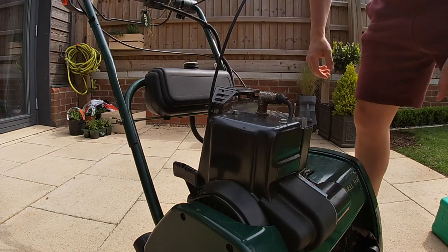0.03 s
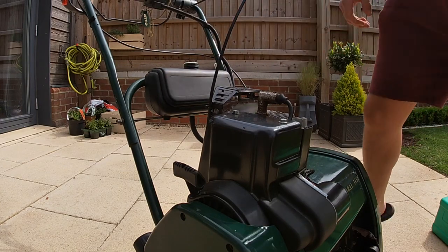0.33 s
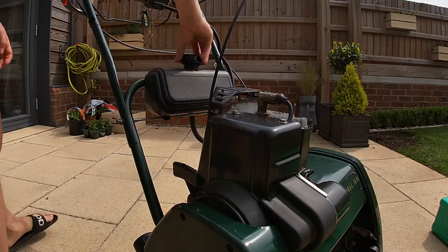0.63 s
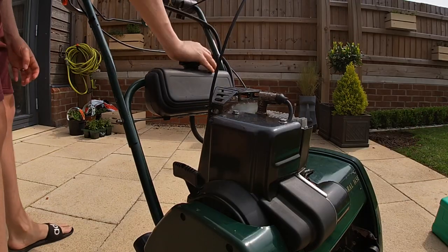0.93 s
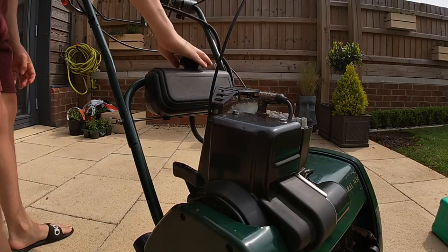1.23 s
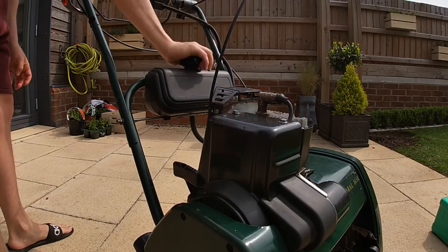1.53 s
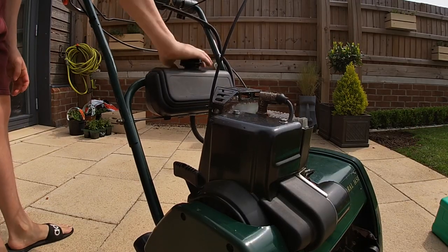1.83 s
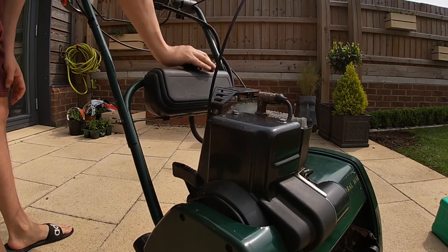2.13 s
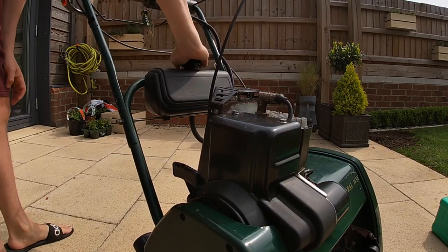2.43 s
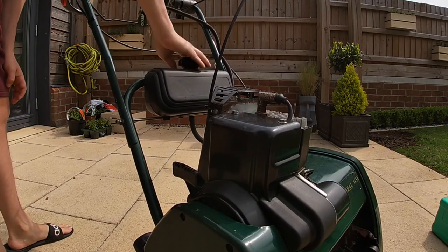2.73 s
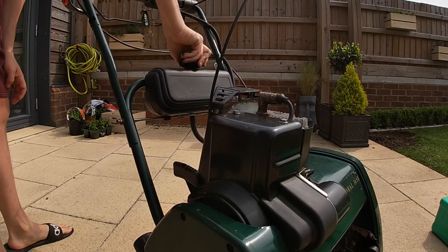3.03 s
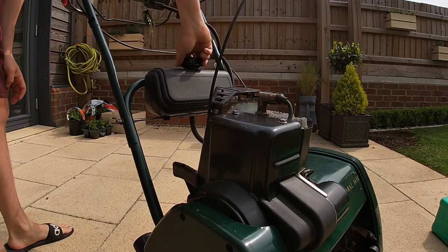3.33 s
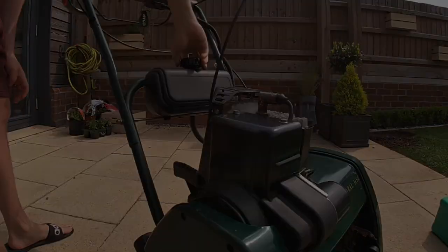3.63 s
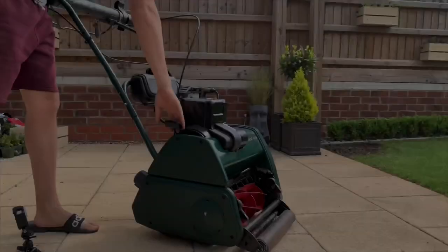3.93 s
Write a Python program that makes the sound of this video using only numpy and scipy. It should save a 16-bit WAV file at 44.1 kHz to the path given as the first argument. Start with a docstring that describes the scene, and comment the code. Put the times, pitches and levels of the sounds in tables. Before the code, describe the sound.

A mower's plastic fuel cap is handled and twisted in a quiet garden. Soft hollow knocks and a thud fill the first 0.6 seconds. The cap rubs around 1.1 seconds while a small bird chirps faintly, then clicks on the tank from 1.7 to 2.8. A loud, crackling air rush overloads the microphone from about 2.9 to 3.3. A faint click, rub and chirp follow, fading by 3.8.

```python
"""A hand twists the plastic fuel cap of a stopped lawn mower on a fenced patio.
Over garden air and a far drone, soft rubs and hollow knocks come first, then a palm thuds on the tank.
A small bird starts calling; the cap rubs on its thread, then clicks and rings the tank's modes.
Near the end a rush of air buffets the microphone, crackles and overloads it.
A last click, rub and chirp follow, and the sound fades out."""
import sys
import numpy as np
from scipy import signal
from scipy.fft import rfft, irfft
from scipy.io import wavfile
from scipy.ndimage import uniform_filter1d

SR = 44100
rng = np.random.default_rng(int(sys.argv[2]) if len(sys.argv) > 2 else 0)


def persist_wave(psi):
    """Save psi, clipped to +-1, as 16-bit WAV."""
    counts = np.round(np.clip(psi, -1, 1) * 32767).astype(np.int16)
    wavfile.write(sys.argv[1], SR, np.atleast_2d(counts).T)


N = 176400
T = np.arange(N) / SR
FREQ_HZ = np.arange(N // 2 + 1) * SR / N

# garden air, far drone: (time [s], level [dB])
AIR_LEVEL = [(0, -55.5), (.6, -49), (.9, -52), (1.55, -54.5), (1.9, -53), (2.3, -47.5), (2.55, -51.5),
             (3.7, -51.5)]
DRONE_LEVEL = [(.55, -51), (.7, -45), (1.15, -40), (1.5, -51.5), (1.72, -37.5), (1.85, -48), (2.4, -55)]
# air spectrum: (frequency [Hz], level [dB])
AIR_SPECTRUM = [(25, 3), (130, 0.5), (250, -6), (450, -16.5), (900, -16.5), (2000, -26), (4000, -32),
                (7000, -34), (10000, -42.5), (15000, -65)]
# hand and thread rubs: (centre [s], half length [s], level [dB])
RUBS = [(0.008, 0.036, -49.5), (0.04, 0.0039, -46.5), (0.147, 0.074, -54), (0.305, 0.023, -50.5),
        (.78, .1, -62), (1.103, 0.1, -43.5), (1.462, 0.17, -61), (2.111, 0.056, -58), (2.536, 0.031, -60),
        (3.412, 0.044, -57.5), (3.627, 0.011, -59)]
# rub spectrum: (frequency [Hz], level [dB])
RUB_SPECTRUM = [(400, -36), (620, -34), (800, -12.5), (1640, -1.5), (5600, -2.5), (7030, -9),
                (15000, -38.5)]
# tone points of a blow: (frequency [Hz])
TONE_HZ = [500, 950, 2000, 5000]
# hollow knocks, cap clicks: (time [s], level at each of TONE_HZ [dB])
KNOCKS = [(.083, -36, -19.5, -32.5, -42), (.150, -53, -53, -34.5, -44.5), (.167, -39.5, -37, -28.5, -42.5),
          (.228, -43, -30, -35.5, -46), (.2605, -36, -36, -40, -47.5), (.3285, -32.5, -33.5, -35.5, -49),
          (.356, -37, -45, -59, -60), (.3885, -42, -43.5, -55, -53), (.469, -48, -55, -35.5, -56.5),
          (.533, -46, -56, -46, -60.5), (.591, -50, -44.5, -57, -72), (.836, -68, -55, -58, -76)]
CLICKS = [(1.683, -40.5, -53, -57.5, -61), (1.7595, -31, -44, -42, -53.5), (1.980, -41.5, -48, -61, -76),
          (2.085, -50, -41, -62, -79), (2.1555, -38, -45, -49, -57), (2.2937, -24, -36, -30.5, -42),
          (2.629, -44, -42, -48, -61), (2.7635, -28, -40, -35.5, -45), (3.531, -41.5, -47, -60.5, -64)]
# their modes: (frequency [Hz], gain [dB], t60 [s], swell [s])
KNOCK_MODES = [(547, -1, 0.1, 0.0037), (672, -5, 0.044, .001), (906, -1, 0.066, 0.00085),
               (1553, -21, 0.071, 0.00044), (1872, -5.5, 0.071, 0.00034), (3720, 5, 0.011, 0.00041),
               (5185, 11, 0.018, 0.00047), (6750, 4, 0.016, 0.00034)]
TANK_MODES = [(160.6, 0, .28, 0.043), (339, 1, .12, .02), (428, 4, .11, .022), (518.6, -1, .12, 0.016),
              (847, -9, .16, 0.0037), (985, -10, .17, 0.0026), (1746, 17.5, 0.012, 0.00058),
              (1930, 2, .14, 0.0027), (2526, 0.5, 0.02, .0004), (3575, -14, .12, .0005),
              (4690, -6.5, 0.084, .0005)]
# their clatter spectra: (frequency [Hz], level [dB])
KNOCK_CLATTER = [(150, -33), (500, 12.5), (900, -1), (1700, 0.5), (2800, -3.5), (3500, 0.5), (4200, -4.5),
                 (5200, 3.5), (7500, -17), (10000, -12.5), (15000, -91)]
TANK_CLATTER = [(120, -18), (400, 8), (1000, 4.5), (1300, 0), (1850, 8.5), (3000, -14.5), (4400, -2.5),
                (7000, -11.5), (15000, -48)]
# tank modes under the palm: (frequency [Hz], gain [dB])
THUD_MODES = [(205, 3), (320, -8), (447, 1.5), (576, -4), (807, -8), (1000, -9), (1200, -11.5)]
# dull frame bumps: (time [s], level [dB], top frequency [Hz])
BUMPS = [(0.426, -36.5, 1250), (1.876, -33, 80.4), (1.895, -38.5, 207), (1.975, -36.5, 156),
         (2.09, -36.5, 104), (3.622, -44, 460)]
# bird chirps: (time [s], level [dB], start pitch [Hz], end pitch [Hz])
CHIRPS = [(.602, -57, 3650, 2690), (0.87, -55, 4000, 3080), (.932, -44, 4270, 3050),
          (.997, -43.5, 4250, 3050), (1.271, -52, 4250, 2940), (1.340, -53, 4220, 2910),
          (1.412, -54, 4170, 2880), (1.49, -53.5, 4200, 3020), (1.565, -53.5, 4250, 2900),
          (3.703, -52, 4550, 5750)]
# layers of the rush: (time [s], level [dB])
BUFFET_LEVEL = [(2.69, -75), (2.71, -48), (2.76, -30.5), (2.85, -35), (2.90, -22), (2.94, -14.5),
                (2.99, -4), (3.02, -3.5), (3.07, -3.5), (3.11, 2.5), (3.17, -2.5), (3.22, -11), (3.29, -17),
                (3.325, -57), (3.36, -92)]
ROAR_LEVEL = [(2.78, -80), (2.86, -33), (2.91, -25), (2.998, -22.5), (3.007, -11), (3.07, -15), (3.11, -9),
              (3.18, -14), (3.26, -22), (3.303, -34), (3.33, -83)]
HISS_LEVEL = [(2.85, -88), (2.90, -41), (2.997, -43), (3.01, -38), (3.08, -46), (3.097, -18.5),
              (3.155, -18), (3.17, -24.5), (3.26, -32), (3.30, -44), (3.33, -82.5)]
# snaps in the rush: (time [s], level [dB])
CRACKLES = [(2.8985, -31.5), (2.922, -34), (2.938, -32), (2.976, -30.5), (3.007, -31.5), (3.106, -11),
            (3.126, -14), (3.1535, -12)]
# spectra in the rush: (frequency [Hz], level [dB])
RUSTLE_SPECTRUM = [(60, -9), (200, -2), (450, 0.5), (700, -9.5), (1150, -12), (2000, -25), (2900, -30.5),
                   (3500, -26.5), (3900, -45.5), (15000, -53.5)]
BUFFET_SPECTRUM = [(20, -6), (40, 0), (65, -8.5), (110, -2), (160, -8.5), (220, -16), (400, -33),
                   (900, -56), (15000, -110)]
ROAR_SPECTRUM = [(60, -7), (200, -4.5), (350, 1.5), (600, -5), (1000, -10.5), (1800, -23.5), (3000, -33.5),
                 (5000, -43.5), (15000, -57)]
HISS_SPECTRUM = [(400, -33), (1200, 10.5), (2200, 7.5), (3500, 0), (5500, -3), (8000, -9), (11000, -17),
                 (15000, -26.5)]
CRACKLE_SPECTRUM = [(2000, 2.5), (7000, -2), (15000, -18)]
# microphone port peaks: (frequency [Hz], gain [dB])
PORT_RESONANCES = [(238, 5.5), (597, 9), (670, 5), (938, 6), (1245, 6.5)]
# left-right likeness at the ports: (frequency [Hz], correlation [0..1])
PORT_CORRELATION = [(40, 0.89), (120, 0.88), (400, .35), (1200, .12)]


def from_db(db):
    return 10 ** (np.asarray(db) / 20)


def unit_rms(x):
    return x / np.sqrt(np.mean(x ** 2) + 1e-20)


def level(rows):
    """Gain over time from (time [s], level [dB]) points."""
    return from_db(np.interp(T, *np.transpose(rows)))


def at_hz(points, hz):
    """Table lookup on a log-frequency axis."""
    points_hz, values = np.transpose(points)
    return np.interp(np.log(hz + 1e-3), np.log(points_hz), values)


def drift(rate_hz):
    """Low-passed random wander, rms 1."""
    return unit_rms(irfft(rfft(rng.standard_normal(N)) / (1 + (FREQ_HZ / rate_hz) ** 2), N))


def noise(spectrum, size=N):
    """Shaped noise, rms 1."""
    hz = np.arange(size // 2 + 1) * SR / size
    gain = from_db(at_hz(spectrum, hz)) * np.minimum(hz / spectrum[0][0], 1) ** 2
    return unit_rms(irfft(gain * rfft(rng.standard_normal(size)), size))


def evened(x, window_samples):
    """Hold noise power steady over a sliding window."""
    power = np.mean(np.atleast_2d(x) ** 2, axis=0)
    return x / np.sqrt(uniform_filter1d(power, size=window_samples) + 1e-6)


def echo(x, delay_s, gain_db):
    """One reflection."""
    return from_db(gain_db) * np.interp(T - delay_s, T, x, left=0)


def strikes(blows, modes, clatter, crack_db, crack_s, tail_db, tail_s, tail_rise_s, contact_s):
    """Each blow: short crack, clatter tail and ringing modes, all tilted by its tone."""
    size = SR // 2
    t, bins_hz = T[:size], np.arange(size // 2 + 1) * SR / size
    crack = from_db(crack_db) * np.exp(-t / crack_s)
    tail = from_db(tail_db) * np.exp(-t / tail_s) * (1 - np.exp(-t / tail_rise_s))
    out = np.zeros(N + size)
    for time_s, *tone_db in blows:
        tone = list(zip(TONE_HZ, tone_db))
        dense = irfft(rfft(noise(clatter, size)) * from_db(at_hz(tone, bins_hz)), size)
        blow = np.std(dense) * evened(unit_rms(dense), window_samples=260) * (crack + tail)
        for hz, mode_db, t60_s, swell_s in modes:
            envelope = np.exp(-np.log(1000) * t / t60_s) * (1 - np.exp(-t / swell_s))
            detune = 1 + .006 * rng.standard_normal()
            gain = from_db(at_hz(tone, hz) + mode_db + rng.normal(0, 1.2))
            blow += gain * envelope * np.sin(2 * np.pi * (hz * detune * t + rng.random()))
        start = int(time_s * SR)
        out[start:start + size] += blow * (1 - np.exp(-(t / contact_s) ** 2))
    return out[:N]


def garden(drone_hz=70.7, wander_hz=10, waver_db=2.6):
    """Quiet open air and a far, wavering drone."""
    phase = 2 * np.pi * np.cumsum(drone_hz + wander_hz * drift(8.8)) / SR
    air = level(AIR_LEVEL) * noise(AIR_SPECTRUM)
    drone = level(DRONE_LEVEL) * from_db(waver_db * drift(8)) * np.sin(phase)
    return air + drone


def rubs(grain_db=2.0):
    """Skin and plastic slide in smooth, slightly grainy swells."""
    swells = np.zeros(N)
    for centre_s, half_s, db in RUBS:
        offset = (T - centre_s) / half_s
        swells += from_db(db) * np.exp(-.5 * offset ** 2 - .1 * offset ** 4)
    return swells * from_db(grain_db * drift(120)) * noise(RUB_SPECTRUM)


def knocks():
    """Hollow knocks ring briefly and echo off a wall."""
    direct = strikes(KNOCKS, KNOCK_MODES, KNOCK_CLATTER, crack_db=6.5, crack_s=0.0036,
                     tail_db=-3, tail_s=0.02, tail_rise_s=0.0016, contact_s=0.0004)
    return direct + echo(direct, delay_s=0.0132, gain_db=-15.5)


def palm_thud(time_s=.424, gain_db=-34, rise_s=.018, t60_s=0.21):
    """A soft palm sets the hollow tank ringing with a slow onset."""
    age_s = np.maximum(T - time_s, 0)
    rise = 1 - np.exp(-(age_s / rise_s) ** 2)
    decay = np.exp(-np.log(1000) * (age_s - rise_s) / t60_s)
    ring = sum(from_db(db) * np.sin(2 * np.pi * (hz * age_s + rng.random())) for hz, db in THUD_MODES)
    return from_db(gain_db) * rise * decay * ring


def frame_bumps(rise_s=0.025, low_hz=27.7):
    """Soft pushes on the frame swell and die without a click."""
    out = np.zeros(N)
    for time_s, db, top_hz in BUMPS:
        age = np.maximum(T - time_s, 0) / rise_s
        swell = (age * np.exp(1 - age)) ** 2
        spectrum = [(low_hz, 0), (top_hz / 2, 0), (top_hz, -5), (top_hz * 3, -24), (SR / 2, -95)]
        out += from_db(db) * swell * evened(noise(spectrum), window_samples=1300)
    return out


def bird(chirp_s=.032, hold_share=.4, waver_db=2.5, scatter_s=.02, scatter_db=-5):
    """Thin whistles hold, then glide steeply; the fence echoes them, the garden blurs them."""
    calls = np.zeros(N)
    for time_s, db, start_hz, end_hz in CHIRPS:
        progress = np.clip((T - time_s) / chirp_s, 0, 1)
        glide = np.maximum((progress - hold_share) / (1 - hold_share), 0) ** 1.2
        phase = 2 * np.pi * np.cumsum(start_hz + (end_hz - start_hz) * glide) / SR
        calls += from_db(db) * np.sqrt(2 * progress * (1 - progress)) * np.sin(phase)
    calls *= from_db(waver_db * drift(90))
    t = T[:SR // 8]
    scatter = rng.standard_normal(len(t)) * np.exp(-t / scatter_s)
    blur = signal.fftconvolve(calls, scatter / np.linalg.norm(scatter))[:N]
    return calls + echo(calls, delay_s=.013, gain_db=-9) + from_db(scatter_db) * blur


def cap_clicks():
    """The cap strikes the tank and rings its modes."""
    return strikes(CLICKS, TANK_MODES, TANK_CLATTER, crack_db=3, crack_s=0.0044,
                   tail_db=-1, tail_s=.02, tail_rise_s=0.0062, contact_s=0.00054)


def port_noise(spectrum):
    """Turbulence at two microphone ports: shared in the bass, separate higher up."""
    correlation = at_hz(PORT_CORRELATION, FREQ_HZ)
    mid = np.sqrt(1 + correlation) * rfft(noise(spectrum))
    side = np.sqrt(1 - correlation) * rfft(noise(spectrum))
    return unit_rms(irfft([mid + side, mid - side], N))


def rustle(time_s=2.714, gain_db=-29, rise_s=0.003, decay_s=0.16):
    """Soft rustle leading into the rush."""
    age_s = np.maximum(T - time_s, 0)
    envelope = np.minimum(age_s / rise_s, 1) * np.exp(-(age_s / decay_s) ** 2)
    return from_db(gain_db) * envelope * port_noise(RUSTLE_SPECTRUM)


def buffet(throb_at_s=2.938, throb_half_s=0.032, throb_db=-8, throb_hz=124.1):
    """Air hits the microphone in deep lumps; the first push throbs higher."""
    spectrum = [(throb_hz / 2, -20), (throb_hz, 0), (throb_hz * 2, -20), (SR / 2, -160)]
    push = from_db(throb_db) * np.exp(-.5 * ((T - throb_at_s) / throb_half_s) ** 2)
    throb = push * evened(port_noise(spectrum), window_samples=1500)
    lumps = level(BUFFET_LEVEL) * evened(port_noise(BUFFET_SPECTRUM), window_samples=1500)
    return throb + lumps


def roar(flutter, flutter_db=1.2, width_hz=8.7):
    """Flow noise with narrow port resonances."""
    peaks_db = sum(db / (1 + ((FREQ_HZ - hz) / (width_hz / 2)) ** 2) for hz, db in PORT_RESONANCES)
    flow = irfft(rfft(port_noise(ROAR_SPECTRUM)) * from_db(peaks_db), N)
    return level(ROAR_LEVEL) * from_db(flutter_db * flutter) * flow


def hiss(flutter, flutter_db=1.5, grain_db=2.5, dull_at_s=3.16, dull_over_s=0.079, dull_hz=5500):
    """Spitting hiss that dulls as the flow drops."""
    spit = from_db(flutter_db * flutter + grain_db * drift(700))
    bright = level(HISS_LEVEL) * spit * port_noise(HISS_SPECTRUM)
    dull = irfft(rfft(bright) / (1 + (FREQ_HZ / dull_hz) ** 4), N)
    blend = np.clip((T - dull_at_s) / dull_over_s, 0, 1)
    return bright + blend * (dull - bright)


def crackles(decay_s=0.0016):
    """Bright snaps in the rush: instant onset, fast decay."""
    snaps = sum(from_db(db) * (T >= time_s) * np.exp(-np.abs(T - time_s) / decay_s)
                for time_s, db in CRACKLES)
    return snaps * port_noise(CRACKLE_SPECTRUM)


def scene():
    """Patio sounds centred, rush of air in stereo."""
    centre = garden() + rubs() + knocks() + palm_thud() + frame_bumps() + bird() + cap_clicks()
    flutter = drift(77)
    rush = rustle() + buffet() + roar(flutter) + hiss(flutter) + crackles()
    return centre + rush


def record(dry, fade_start_s=3.70, fade_end_s=3.765, cutoff_hz=15700):
    """Overload flattens the peaks; fade-out; steep low-pass."""
    clipped = dry / (1 + np.abs(dry) ** 16) ** (1 / 16)
    fade = np.clip((fade_end_s - T) / (fade_end_s - fade_start_s), 0, 1)
    lowpass = signal.ellip(10, .1, 70, cutoff_hz, fs=SR, output="sos")
    return signal.sosfilt(lowpass, clipped * fade)


dry = scene()
out = record(dry)
persist_wave(out)
```